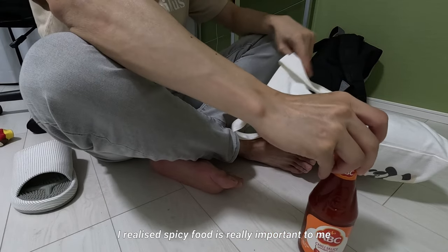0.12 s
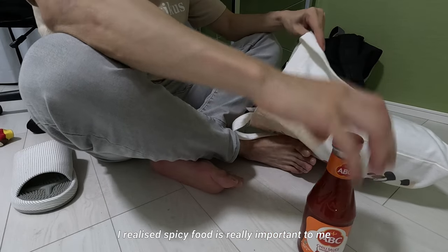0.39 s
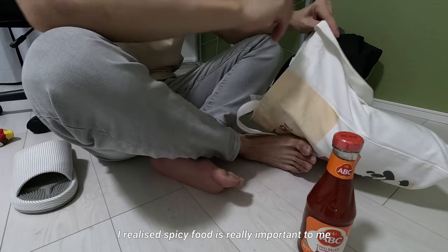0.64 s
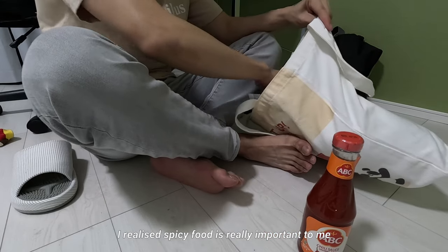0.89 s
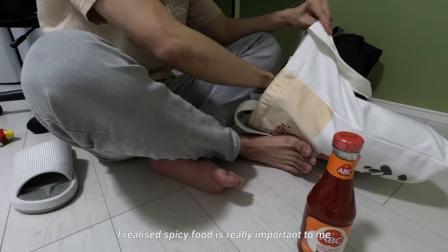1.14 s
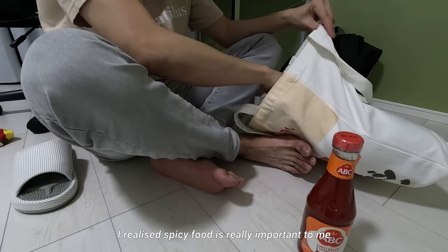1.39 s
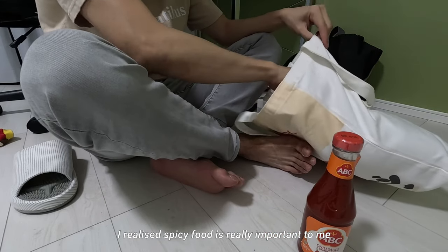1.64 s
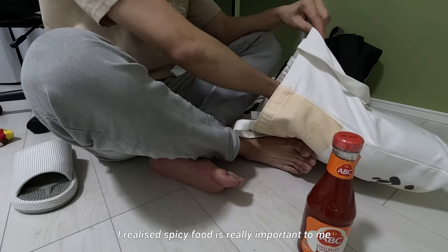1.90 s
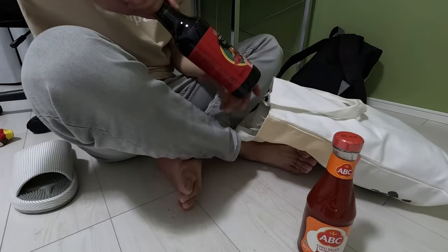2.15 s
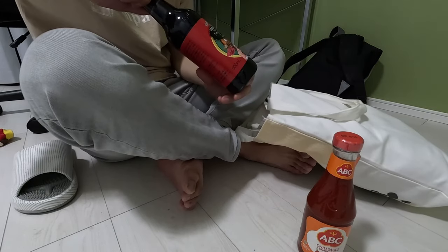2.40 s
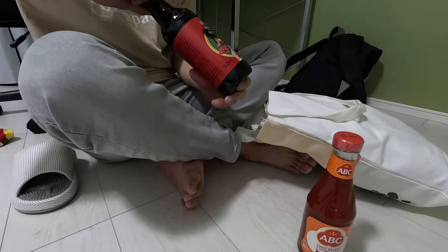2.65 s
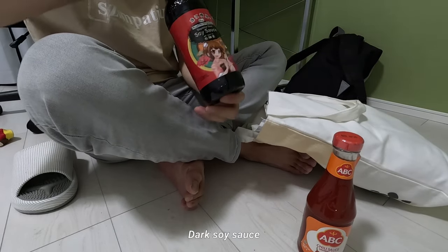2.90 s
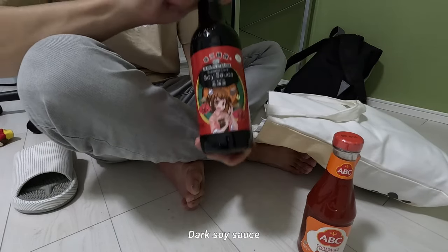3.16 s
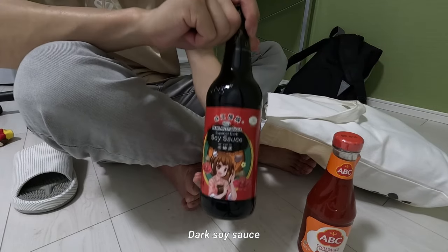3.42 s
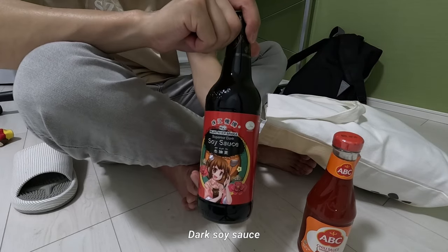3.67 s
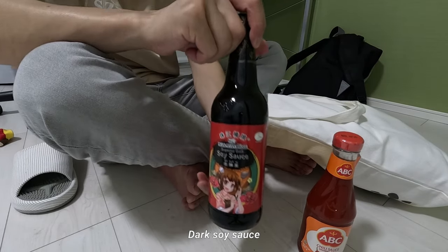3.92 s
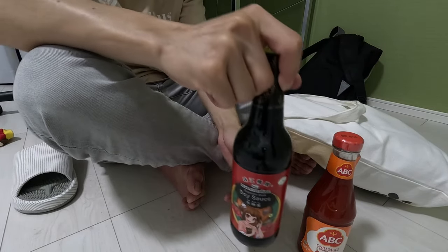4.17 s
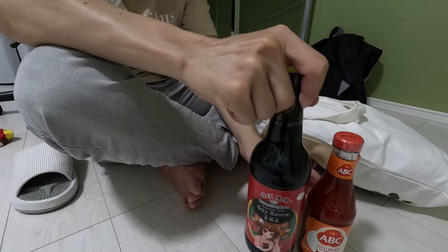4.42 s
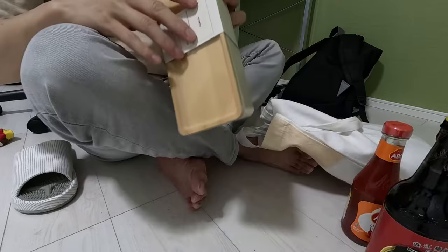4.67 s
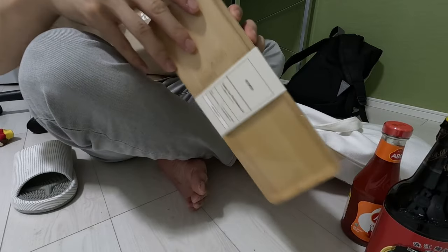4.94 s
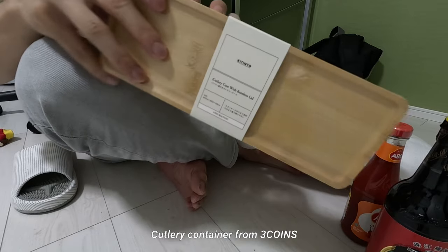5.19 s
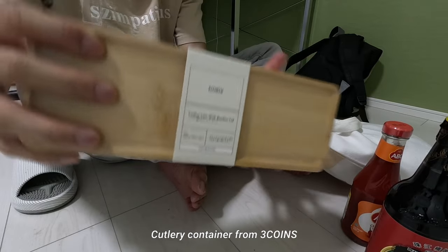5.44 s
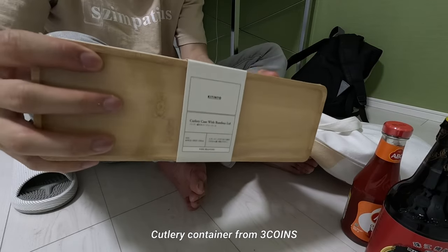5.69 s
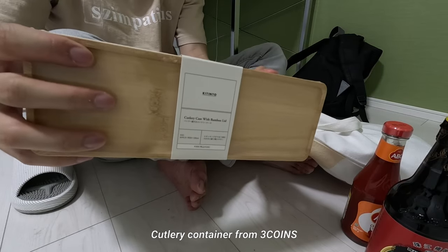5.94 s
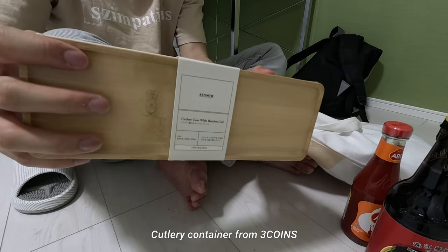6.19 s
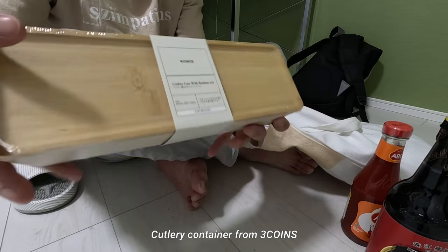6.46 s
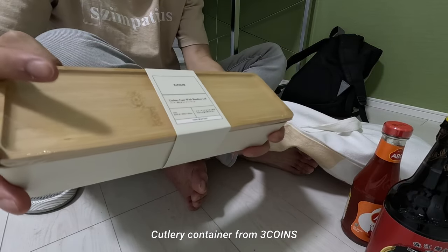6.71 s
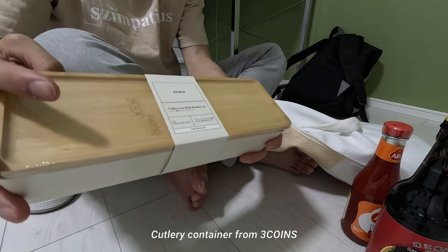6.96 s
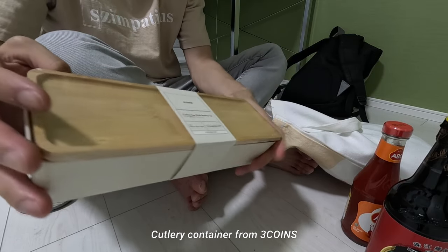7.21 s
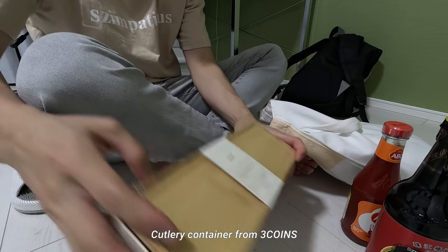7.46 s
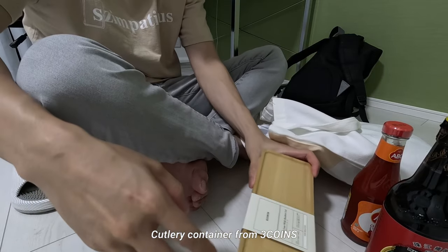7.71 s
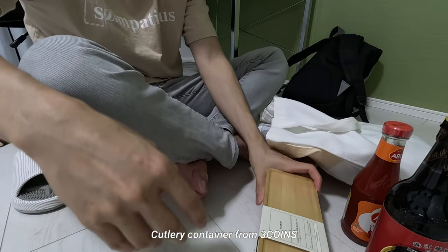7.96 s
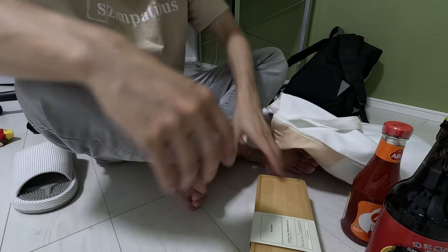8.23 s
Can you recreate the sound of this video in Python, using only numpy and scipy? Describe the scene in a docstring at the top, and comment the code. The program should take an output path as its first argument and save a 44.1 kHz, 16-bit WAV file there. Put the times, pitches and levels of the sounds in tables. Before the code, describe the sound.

Close indoor unpacking: heavy bottle thuds, grainy bag rustling, light hand rubbing and paper rasps, ending with sharp wooden box knocks on tile.

```python
"""Cloth rustles and a full bottle thuds down on a tiled floor as someone unpacks a bag in a small room.
Three stretches join by hard cuts: goods drag and moan in the bag, hands and sleeves rub over glass and a box,
and the wooden box is knocked down and nudged along the tiles. A motor drones faintly outside.
Rubbing is grainy noise in bands, blows set decaying sines ringing, drags are noise in narrow resonances,
and the motor is a stack of wavering sines."""
import sys
import numpy as np
from scipy import signal
from scipy.fft import rfft, irfft, next_fast_len
from scipy.io import wavfile

SR = 44100
rng = np.random.default_rng(int(sys.argv[2]) if len(sys.argv) > 2 else 0)


def gain_from_decibels(decibels):
    """Convert decibel values to linear amplitude factors."""
    exponent = np.asarray(decibels, float) / 20
    return 10 ** exponent


def store_wav(level_fs):
    """Save 16-bit WAV to argv[1]."""
    pcm = np.round(np.clip(np.atleast_2d(level_fs), -1, 1) * 32767)
    wavfile.write(sys.argv[1], SR, pcm.T.astype(np.int16))


N = 368141

# All levels are those of the layers ahead of the microphones; spectra and modes are relative.
# times of the two hard cuts [s]
CUTS_S = [2.14, 4.556]

# fine hiss of fibres: pitch_hz [Hz], density_db [dB per Hz]
HISS_SPECTRUM = [(2500, -3), (3800, -0.5), (4800, 0), (6000, 1), (7600, 0.5), (9000, -5.5), (10200, -6),
                 (11500, -19), (14000, -16.5), (15500, -60)]
# coarse weave, same columns
WEAVE_SPECTRUM = [(1100, -16), (1800, -1), (2200, -3), (3200, -3), (4200, -6), (7000, -18)]
# dull scuff of folds, same columns
SCUFF_SPECTRUM = [(450, -15), (750, 1), (1000, 9.5), (1400, 5), (1900, -1), (3000, -10.5), (5000, -49)]
# left-right likeness of rubbing: pitch_hz [Hz], likeness [0 to 1]
RUB_ALIKE = [(200, 0.62), (1000, 0.78), (3000, 0.65), (7000, 0.94), (15000, 0.85)]
# resonances of the hollow goods: pitch_hz [Hz], width_hz [Hz, sets the decay], level_db [dB]
HOLLOW_MODES = [(191, 22, -31), (276, 71, 8), (369, 94, 4.5), (420, 43, -4.5), (621, 176, 8)]
# cloth and skin never quite still, one row a stretch: hiss_db, weave_db, scuff_db, drag_db [dB]
RESTLESS_DB = [(-72, -62.5, -55, -59), (-81, -87, -70.5, -70.5), (-76, -66.5, -57.5, -59.5)]
# strokes of hands, sleeves and goods: middle_s [s], length_s [s], hiss_db, weave_db, scuff_db [dB]
STROKES = [(-0.01, 0.77, -58.5, -55.5, -57.5), (0.67, 1, -59.5, -59.5, -59), (1.082, 0.23, -58, -54.5, -54),
           (1.21, 0.087, -60.5, -57, -73), (1.273, 0.14, -57.5, -52, -42.5), (1.45, 0.49, -50, -51, -47),
           (1.678, 0.2, -58, -49.5, -44.5), (1.81, 0.44, -60.5, -56, -56),
           (2.041, 0.23, -57.5, -48.5, -45.5), (2.322, 0.48, -65, -65, -81), (2.577, 0.3, -67, -69, -69),
           (2.72, 0.13, -67.5, -70, -68), (2.82, 0.45, -77.5, -88, -87), (3.04, 0.34, -63, -66, -83),
           (3.204, 0.45, -62.5, -54.5, -63), (3.22, 0.29, -74, -56.5, -61), (3.422, 0.36, -57, -53, -63.5),
           (3.555, 0.24, -67, -64, -73), (4.119, 0.29, -57, -65, -70), (4.265, 0.57, -53, -58, -68),
           (4.455, 0.56, -60, -63, -78), (4.578, 0.094, -59, -59, -71), (4.67, 0.14, -56, -69, -75),
           (4.923, 0.14, -49, -61, -63), (5.049, 0.18, -47, -72, -63), (5.184, 0.18, -53, -54, -55.5),
           (5.281, .2, -54.5, -56.5, -50), (5.415, 0.24, -56, -57.5, -58.5), (5.63, 0.14, -58, -56, -65),
           (5.724, 0.34, -64.5, -62.5, -58.5), (5.966, 0.55, -76, -89, -64), (6.157, 0.12, -62, -71, -62),
           (6.33, 0.075, -62, -53, -58), (6.421, 0.056, -49, -53, -66), (6.491, 0.055, -59, -44.5, -47),
           (6.532, 0.47, -62, -59, -55), (6.575, 0.06, -52.5, -46.5, -38.5), (6.693, 0.083, -66, -53, -46),
           (6.75, 0.13, -57, -53, -47), (7.336, 0.17, -60, -61.5, -49), (7.458, 0.29, -64, -63, -57.5),
           (7.554, 0.1, -77, -53.5, -46.5), (7.627, 0.27, -46.5, -56, -51), (7.8, 0.4, -66, -63, -51.5),
           (7.876, 0.13, -68, -52, -33.5), (7.947, 0.23, -61.5, -52.5, -41), (8.078, .2, -64, -58, -51.5),
           (8.198, .15, -55, -61, -36.5), (8.301, .2, -57.5, -43, -38.5)]
STROKE_ROUND = 1.46   # power of the cosine arch
# drag above the scuff of a stroke, one value a stretch [dB]
DRAG_OVER_SCUFF_DB = [5, -7, 0]
# goods shifting with a dull drag alone: middle_s [s], length_s [s], level_db [dB]
SHIFTS = [(0.127, 0.14, -37), (0.5, 0.21, -52.5), (1.424, 0.66, -43.5), (3.12, 0.22, -62),
          (5.651, 0.15, -48.5), (5.935, 0.33, -54.5), (6.226, 0.23, -64)]
# unevenness of all rubbing, one value a stretch [dB]
FLUTTER_DB = [1.5, 0.44, 2]
FLUTTER_HZ = 20.6
# cloth jolted by a tap, hiss and weave against its crack, scuff and drag against its ring [dB]
PUFF_DB = [-22.5, -25.5, -15.5, -21]
PUFF_T60_S = 0.12
# creases snapping in bag and paper band: time_s [s], rate [snaps per s]
CRACKLE_RATE = [(0, 5.8), (.4, 65), (2.1, 69), (2.8, 3.5), (4.5, 2), (4.9, 29), (5.7, 50), (5.8, 10),
                (6.25, 10), (6.3, 50), (6.8, 33), (6.9, 3), (8.35, 6)]

# room air: pitch_hz [Hz], density_db [dB per Hz]
AIR_SPECTRUM = [(25, 8), (50, 2), (100, 0), (200, -4), (300, -9.5), (500, -16.5), (800, -36), (1000, -18.5),
                (1400, -15.5), (2000, -25), (3000, -46), (6000, -57), (10000, -51), (15000, -63)]
# loudness of the air: time_s [s], level_db [dB]
AIR_LEVEL = [(0, -57), (2.139, -60.5), (2.141, -58.5), (4.555, -58.5), (4.557, -64), (8.35, -41)]
# left-right likeness of air and rumble: pitch_hz [Hz], likeness [0 to 1]
AIR_ALIKE = [(60, 1), (290, 0.94), (640, 0.18), (3000, .2), (15000, .1)]
# deep rumble and the floor's drumming: time_s [s], deep_db [dB], drum_db [dB]
RUMBLE_LEVEL = [(0.0, -69, -69), (0.24, -31.5, -47), (0.47, -38.5, -41.5), (0.73, -44.5, -85),
                (0.9, -50.5, -73), (1.11, -57, -59.5), (1.3, -50.5, -56), (1.68, -49.5, -48),
                (1.9, -58, -58), (2.05, -52, -72), (2.135, -43, -59), (2.145, -73, -62), (2.5, -72, -75),
                (2.8, -62, -89), (3.03, -60, -63.5), (3.13, -58, -46.5), (3.24, -57, -62), (3.45, -58, -64),
                (3.75, -52, -63.5), (4.5, -78, -59), (4.75, -46, -68), (5.0, -57, -62), (5.24, -55, -54),
                (5.6, -52, -59), (6.15, -51, -62), (6.6, -64, -59), (7.0, -54, -67), (7.65, -78, -60),
                (7.88, -24.5, -52), (8.06, -44, -56), (8.35, -33, -44)]
RUMBLE_LUMPS_DB, RUMBLE_LUMPS_HZ = 2, 5.7

# taps of fingers, rings and goods: start_s [s], ring_db [dB], ring_hz [Hz], crack_db [dB], crack_hz [Hz]
TAPS = [(0.075, -20.5, 606, -30, 2600), (0.307, -35, 594, -65, 2790), (0.42, -39, 953, -41, 3080),
        (0.461, -56, 980, -39.5, 2940), (0.698, -43, 1010, -36.5, 4230), (0.751, -44, 1030, -36, 3180),
        (0.842, -38.5, 1670, -34.5, 2510), (0.887, -43, 1180, -36, 3700), (1.229, -34.5, 660, -39, 2600),
        (1.447, -17.5, 757, -25.5, 4030), (1.517, -32, 1880, -28.5, 4080), (1.531, -26, 770, -31, 3030),
        (2.047, -26.5, 880, -36, 2600), (2.367, -45, 1620, -40, 6200), (2.434, -45, 1410, -58, 2560),
        (2.472, -32, 1060, -34, 2150), (2.483, -36, 1310, -40, 2750), (4.562, -46.5, 570, -32, 2770),
        (4.638, -43, 1510, -31.5, 3480), (4.951, -57, 980, -32.5, 7060), (5.264, -45, 1020, -46, 3080),
        (5.327, -39, 690, -37, 3750), (5.369, -60, 1220, -36, 3980), (5.474, -43, 1360, -39, 3570),
        (5.524, -54, 1330, -48, 6000), (5.618, -35, 1310, -32.5, 3950), (5.634, -35, 1280, -33, 4070),
        (5.69, -36, 1240, -36, 4480), (5.7, -24.5, 1180, -28, 4330), (6.327, -41, 1020, -24.5, 3500),
        (6.376, -35, 1020, -38, 3240), (6.429, -46, 1070, -27.5, 5440), (6.485, -39, 940, -24, 3800),
        (6.523, -29.5, 1000, -54, 4130), (6.685, -37, 610, -35, 3144), (8.178, -22, 880, -31, 3270)]
TAP_CYCLES = 20   # cycles to die by 60 dB
ROOM_T60_S, WALL_HZ, ROOM_DB = 0.24, 3500, -11   # the decay time is that of the low tones

# bottle rocking to rest: start_s [s], level_db [dB], contact_ms [ms at half height], slab_db [dB over level]
THUDS = [(0.077, -6.5, 0.84, -2.5), (0.161, -18, 2.1, -8), (0.189, -14, 1.96, -11), (0.3097, -9, 1.84, -26),
         (0.426, -22, 1.56, -12), (0.499, -27.5, 1.4, -2)]
# ringing of the tiles: pitch_hz [Hz], level_db [dB], t60_s [s]
FLOOR_MODES = [(165.6, 1.5, 0.17), (102, -16.5, 1), (218.6, -4, 0.097), (327, -3.5, 0.14),
               (413, 6.5, 0.055), (594, -13.5, 0.23)]
# deep note of the slab, same columns
SLAB_MODES = [(85, 0.0072, 0.15)]
SLAB_LATE_S = 0.0145   # the slab answers a little late

# full bottle moaning in tugs along the bag: middle_s [s], length_s [s], pitch_hz [Hz], level_db [dB]
MOAN_TUGS = [(1.083, .12, 400, -47), (1.275, 0.169, 370, -34), (1.498, .2, 315, -43.5),
             (1.641, .1, 370, -29.5), (1.711, .14, 298, -28.5), (1.914, 0.074, 374, -52),
             (2.003, 0.1, 380, -38.5), (2.078, 0.08, 376, -47)]

# swell of the motor's lowest tone: time_s [s], level_db [dB]
DRONE_LEVEL = [(4.56, -62), (4.7, -57), (5.7, -60), (6.27, -58), (6.4, -55), (6.85, -48.5), (7.1, -42),
               (7.78, -46)]
# overtones of the motor: multiple [times the lowest tone], level_db [dB]
OVERTONES = [(2, -55), (3, -62.5), (4, -63.5), (5, -65.5), (6, -71), (7, -69.5)]
MOTOR_HZ, MOTOR_WAVER = 51.14, 0.0079   # lowest tone, spread of its speed as a share
# a second low tone that comes and goes: time_s [s], pitch_hz [Hz], level_db [dB]
GROAN = [(4.6, 70.6, -53), (4.934, 71, -42), (5.062, 71.9, -50), (5.304, 69.7, -45), (5.454, 60.8, -67),
         (5.486, 63, -50), (5.788, 70.2, -54), (6.044, 69, -46), (6.2, 72.1, -77)]

# rasps of the paper band: middle_s [s], level_db [dB], length_s [s, spread of the bell], dull_db [dB over level]
RASPS = [(5.113, -49.5, 0.011, -16), (5.18, -55, 0.012, -8), (5.377, -52, 0.011, -16),
         (5.601, -47.5, 0.0066, -20), (6.297, -53, 0.0095, -2), (6.327, -41, 0.0069, -18),
         (6.4916, -45, 0.0078, -16), (6.582, -64, 0.0088, 4), (6.689, -53, 0.009, 1)]
# fingertip creeping over the lid: middle_s [s], length_s [s], level_db [dB]
CREEPS = [(5.44, 0.13, -44), (5.81, 0.093, -45.5), (5.954, 0.19, -45), (6.085, 0.072, -54),
          (6.157, 0.17, -43), (6.24, 0.09, -57)]
TICKS_PER_S, TICK_UNEVEN, TICK_SPREAD_DB = 45, .35, 3.0
TICK_LOW_HZ, TICK_HIGH_HZ, TICK_T60_S = 4100, 10000, 0.01

# box on the tiles: start_s [s], level_db [dB], then floor_db, body_db, rattle_db [dB over level]
KNOCKS = [(7.838, -1, -8, -8.5, -17.5), (8.1555, -5, -18, -2.5, -9.5), (8.2324, 0, -13.5, -6, -7.5),
          (8.238, -19, -34, 10.5, 18.5)]
# hollow body of the box: pitch_hz [Hz], level_db [dB], t60_s [s]
BODY_MODES = [(320, -3.5, 0.049), (424, -2, 0.053), (620, -10, 0.02)]
# its panels, same columns
PANEL_MODES = [(880, -6, 0.016), (1020, -2.5, 0.016), (1255, 7, 0.007), (1486, -7, 0.037),
               (1610, -5.5, 0.025), (2140, -6, 0.016), (2490, -8, 0.0077)]
# its loose lid, same columns
LID_MODES = [(3150, 4, 0.015), (3780, -4.5, 0.021), (4170, -11.5, 0.04), (4700, -7, 0.02),
             (5500, -2, 0.006), (6330, -10.5, 0.026), (7130, -1, 0.0054)]
# shudder after a knock: pitch_hz [Hz], density_db [dB per Hz]
SHUDDER_SPECTRUM = [(150, -7), (300, 8), (1000, -0.5), (1800, -6), (3000, -17.5), (6000, -33)]
# box sliding on the tiles: time_s [s], level_db [dB]
SLIDE_LEVEL = [(7.88, -47), (7.915, -36), (7.96, -27.5), (8.0, -33), (8.012, -53), (8.04, -34)]

# lean of the near sounds: time_s [s], left_minus_right_db [dB]
LEAN = [(0.0, 1.5), (1.37, -0.5), (2.46, -0.5), (2.83, 2), (3.16, 0), (4.04, 2.5), (4.6, 1.5), (6.0, 3),
        (6.6, 1.5), (7.02, 3.5), (8.35, 0.5)]
# tilt of the microphone pair: pitch_hz [Hz], left_minus_right_db [dB]
MIC_TILT = [(60, 0.0), (180, -0.5), (550, -1), (1650, -0.5), (4970, -1.5), (15000, 2)]


def rms_one(x):
    """Scale to rms 1."""
    return x / np.sqrt(np.mean(x ** 2) + 1e-20)


def in_time(rows):
    """Columns of a curve, one value a sample."""
    s, *columns = np.transpose(rows)
    return [np.interp(np.arange(N) / SR, s, c) for c in columns]


def while_on(rows):
    """1 inside a curve's span, with 10 ms edges."""
    t = np.arange(N) / SR
    return np.clip(np.minimum(t - rows[0][0], rows[-1][0] - t) * 100, 0, 1)


def at_hz(points, hz):
    """Read a spectrum on a log frequency axis."""
    return np.interp(np.log(hz), np.log(np.array(points)[:, 0]), np.array(points)[:, 1])


def drift(rate):
    """Slow random wander of spread 1: noise through two equal poles at rate Hz, made at every 40th sample."""
    r = np.exp(-80 * np.pi * rate / SR)
    noise = rng.standard_normal(N // 40 + 2002)
    slow = signal.lfilter([1], [1, -2 * r, r * r], noise)[2000:]   # drop the run-in
    return np.interp(np.arange(N) / 40, np.arange(len(slow)), rms_one(slow - slow.mean()))


def ring(clicks, hz, t60):
    """A unit click sets a sine of height 1 ringing."""
    r, w = gain_from_decibels(-60 / (t60 * SR)), 2 * np.pi * hz / SR
    return signal.lfilter([0, np.sin(w)], [1, -2 * r * np.cos(w), r * r], clicks + 1e-18)


def dying(clicks, t60):
    """Every click starts an envelope that falls by 60 dB in t60 seconds."""
    return signal.lfilter([1], [1, -gain_from_decibels(-60 / (t60 * SR))], clicks)


def grains(per_s, spread_db):
    """Random slips of uneven size over a smooth bed of noise."""
    sizes = gain_from_decibels(spread_db * np.minimum(rng.exponential(1, N), 5))
    return rng.standard_normal(N) * (1 + sizes * (rng.random(N) < per_s / SR))


def banded(source, spectrum, alike, patchy_db):
    """Coloured noise in overlapping octave bands that flicker; left and right partly alike; rms 1."""
    size = next_fast_len(N)
    hz = np.maximum(np.arange(size // 2 + 1) * SR / size, 1)
    likeness = np.clip(at_hz(alike, hz), 0, 1)
    mid, side = rfft([source, rng.standard_normal(N) * np.std(source)], size)
    inside = (hz > spectrum[0][0]) & (hz < spectrum[-1][0])
    pair = np.sqrt(1 + likeness) * mid + np.sqrt(1 - likeness) * side * np.array([[1], [-1]])
    pair = inside * gain_from_decibels(at_hz(spectrum, hz)) * pair
    together = drift(14.0)   # flicker shared by all bands
    octave = np.log2(hz / spectrum[0][0])
    out = 0
    for k in range(int(np.log2(spectrum[-1][0] / spectrum[0][0])) + 2):
        share = np.clip(1 - np.abs(octave - k), 0, 1)
        flicker = gain_from_decibels(patchy_db * (together + .5 * drift(9.0)))
        out = out + flicker * irfft(share * pair, size)[:, :N]
    return rms_one(out)


def narrow(hz, width):
    """Stick-slip noise in a narrow resonance: slow complex noise riding on a moving pitch."""
    turn = 2 * np.pi * np.cumsum(hz) / SR
    return rms_one(drift(width) * np.cos(turn) + drift(width) * np.sin(turn))


def strike(times, dbs, modes, scatter_db, flip=-1):
    """Every blow excites every mode, with a little scatter; at flip -1 neighbouring modes swing opposed."""
    at, out = np.round(np.array(times) * SR).astype(int), np.zeros(N)
    scatter = scatter_db * rng.standard_normal((len(at), len(modes)))
    for k, (hz, db, t60) in enumerate(modes):
        clicks = np.zeros(N)
        clicks[at] = gain_from_decibels(np.array(dbs) + db + scatter[:, k]) * flip ** k
        out += ring(clicks, hz, t60)
    return out


def soft(x, ms):
    """A blunt contact: the push is a bell about ms milliseconds wide at half height."""
    push = np.hanning(int(ms * SR / 500) + 3)
    return signal.fftconvolve(x, push / push.sum())[:N]


def stretch(s):
    """Which of the three stretches a time falls in."""
    return np.searchsorted(CUTS_S, s)


def arch(middle, length):
    """A cosine arch that a cut breaks off."""
    t = np.arange(N) / SR
    swell = np.cos(np.pi * np.clip((t - middle) / length, -.5, .5)) ** STROKE_ROUND
    return swell * (stretch(t) == stretch(middle))


def rub_levels():
    """Gains of hiss, weave, scuff and drag: restless bed, strokes, shifts and puffs after taps add in power."""
    now = stretch(np.arange(N) / SR)
    power = gain_from_decibels(np.transpose(RESTLESS_DB))[:, now] ** 2
    for s, length, hiss_db, weave_db, scuff_db in STROKES:
        dbs = [hiss_db, weave_db, scuff_db, scuff_db + DRAG_OVER_SCUFF_DB[stretch(s)]]
        i, j = max(int((s - length / 2) * SR), 0), int((s + length / 2) * SR)
        power[:, i:j] += (gain_from_decibels(np.array(dbs))[:, None] * arch(s, length)[i:j]) ** 2
    power[3] += sum((gain_from_decibels(db) * arch(s, length)) ** 2 for s, length, db in SHIFTS)
    jolts = np.zeros((4, N))
    for s, ring_db, ring_hz, crack_db, crack_hz in TAPS:
        jolts[:, round(s * SR)] = gain_from_decibels(np.array([crack_db, crack_db, ring_db, ring_db]) + PUFF_DB)
    puffs = dying(jolts + 1e-18, PUFF_T60_S)
    flutter = gain_from_decibels(np.array(FLUTTER_DB)[now] * drift(FLUTTER_HZ))
    return np.sqrt(power + puffs ** 2) * flutter


def crackle():
    """Creases snap at random, each a very short ring at one of eight pitches."""
    sizes = gain_from_decibels(6.54 * np.minimum(rng.exponential(1, N), 3))
    snaps = (rng.random(N) < in_time(CRACKLE_RATE)[0] / SR) * sizes
    pitches, dealt = np.geomspace(2500, 9000, 8), rng.integers(0, 8, N)
    out = sum(ring(snaps * (dealt == k), hz, 11.3 / hz) for k, hz in enumerate(pitches))
    return signal.sosfilt(signal.butter(2, 9500, fs=SR, output="sos"), out)


def hollow_drag():
    """Slips of cloth ring the hollow goods; each resonance flickers by itself."""
    slips, out = grains(200.0, 3.5), 0
    for hz, width, db in HOLLOW_MODES:
        out = out + gain_from_decibels(db + 5.54 * drift(22.6)) * rms_one(ring(slips, hz, 1.7 / width))
    return rms_one(signal.sosfilt(signal.butter(2, [150, 800], "band", fs=SR, output="sos"), out))


def rubbing():
    """Fibres hiss, folds scuff and creases snap; the drag through hollow goods is returned apart."""
    fine, coarse, dull, pull = rub_levels()
    hiss = fine * banded(grains(200.0, 3.5), HISS_SPECTRUM, RUB_ALIKE, patchy_db=.7)
    weave = coarse * banded(grains(200.0, 3.5), WEAVE_SPECTRUM, RUB_ALIKE, patchy_db=.8)
    scuff = dull * banded(grains(150.0, 3.5), SCUFF_SPECTRUM, RUB_ALIKE, patchy_db=.8)
    snaps = gain_from_decibels(2) * np.sqrt(fine * coarse) * crackle()
    return hiss + weave + scuff + snaps, pull * hollow_drag()


def air():
    """Room air: a bed of coloured noise, wide in the treble, whose bands flicker."""
    noise = rng.standard_normal(N)
    return gain_from_decibels(in_time(AIR_LEVEL)[0]) * banded(noise, AIR_SPECTRUM, AIR_ALIKE, patchy_db=-1.0)


def rumble():
    """Deep rumble and the floor's drumming: two low noise bands with lumpy levels."""
    deep_db, drum_db = in_time(RUMBLE_LEVEL)
    deep_spectrum = [(18, -16), (32, 0.5), (60, 4.5), (90, -5.0), (120, 0.0)]   # Hz, dB per Hz
    drum_spectrum = [(85, -21), (110, -1), (170, -5), (210, -2.0), (280, -27.0)]
    deep = banded(rng.standard_normal(N), deep_spectrum, AIR_ALIKE, patchy_db=0.0)
    drum = banded(rng.standard_normal(N), drum_spectrum, AIR_ALIKE, patchy_db=0.5)
    deep = gain_from_decibels(deep_db + RUMBLE_LUMPS_DB * drift(RUMBLE_LUMPS_HZ)) * deep
    return deep + gain_from_decibels(drum_db + RUMBLE_LUMPS_DB * drift(RUMBLE_LUMPS_HZ)) * drum


def taps():
    """A short ring at the struck spot's pitch, an overtone, and a crack of a few milliseconds."""
    out, t = np.zeros(N + 4000), np.arange(4000) / SR
    for s, ring_db, ring_hz, crack_db, crack_hz in TAPS:
        tone = np.sin(2 * np.pi * ring_hz * t) + 0.19 * np.sin(2 * np.pi * 1.8 * ring_hz * t)
        fade = gain_from_decibels(ring_db - 60 * t * ring_hz / TAP_CYCLES) * (1 - np.exp(-t / 0.00015))
        band = signal.butter(2, [crack_hz / 1.25, min(crack_hz * 1.39, 9500)], "band", fs=SR)
        crack = signal.lfilter(*band, np.sign(rng.standard_normal(4000)) * gain_from_decibels(-60 * t / 0.026))
        i = round(s * SR)
        out[i:i + 4000] += fade * tone + gain_from_decibels(crack_db) * crack
    return signal.sosfilt(signal.butter(3, 9000, fs=SR, output="sos"), out[:N])


def room(x):
    """Small-room echo: eight feedback delays a side, duller on every round."""
    size = next_fast_len(N + SR)
    spectrum, hz = rfft(x, size), np.arange(size // 2 + 1) * SR / size
    out = np.zeros((2, len(hz)), complex)
    for k, lag in enumerate(rng.uniform(0.0055, .03, 16)):
        loop = gain_from_decibels(-60 * lag / ROOM_T60_S) / (1 + 1j * hz / WALL_HZ) * np.exp(-2j * np.pi * hz * lag)
        out[k % 2] += loop / (1 - loop) * (-1) ** (k // 2)
    thin = (hz / (hz + 500)) ** 2   # deep bass goes out through the walls
    return irfft(out * spectrum * thin, size)[:, :N]


def slab(times, dbs):
    """The floor slab's deep note, a little after the blow."""
    return -soft(strike(np.array(times) + SLAB_LATE_S, dbs, SLAB_MODES, 0.65), ms=0.34)


def bottle():
    """A heavy glass base: a blunt push into tiles and slab."""
    tiles = 0
    for s, db, contact_ms, slab_db in THUDS:
        tiles = tiles + soft(strike([s], [db - 8.5], FLOOR_MODES, 0.75, flip=0.97), contact_ms)
    s, db, contact_ms, slab_db = np.transpose(THUDS)
    return slab(s, db + slab_db) - tiles


def moan():
    """The dragged bottle, with rougher overtones from uneven slips; the strongest tug sets the pitch."""
    tugs = np.array([(gain_from_decibels(db) * arch(s, length)) ** 2 + 1e-12 for s, length, hz, db in MOAN_TUGS])
    power = tugs.sum(axis=0)
    hz = np.array(MOAN_TUGS)[:, 2] @ tugs / power
    voice = narrow(hz, width=49.0) + 0.23 * narrow(1.4 * hz, width=60.0) + 0.039 * narrow(1.1 * hz, width=99.0)
    return np.sqrt(power) * voice


def motor():
    """Motor outside: wavering low tones from the second cut on, and a groan that comes and goes."""
    turn = 2 * np.pi * np.cumsum(MOTOR_HZ * (1 + MOTOR_WAVER * drift(3.1))) / SR
    drone = gain_from_decibels(in_time(DRONE_LEVEL)[0]) * np.sin(turn)
    for multiple, db in OVERTONES:
        drone = drone + gain_from_decibels(db + 4.0 * drift(4.0)) * np.sin(multiple * turn + multiple)
    low_hz, low_db = in_time(GROAN)
    groan = gain_from_decibels(low_db) * while_on(GROAN) * np.sin(2 * np.pi * np.cumsum(low_hz) / SR)
    return np.sqrt(2) * ((np.arange(N) > CUTS_S[1] * SR) * drone + groan)   # table levels are rms


def rasps():
    """Paper band under the fingers: bell-shaped bursts of coarse grains, bright with a dull part."""
    t, bright, dull = np.arange(N) / SR, 0, 0
    for s, db, length, dull_db in RASPS:
        bell = gain_from_decibels(db) * np.exp(-.5 * ((t - s) / length) ** 2)
        bright = bright + bell
        dull = dull + gain_from_decibels(dull_db) * bell
    bright_noise = banded(grains(600.0, 3.0), WEAVE_SPECTRUM[:4] + HISS_SPECTRUM[2:], RUB_ALIKE, 0)
    dull_noise = banded(grains(400.0, 3.0), SCUFF_SPECTRUM, RUB_ALIKE, 0)
    return bright * bright_noise + dull * dull_noise


def ticks():
    """Skin sticks and lets go at a loosely even pace; each slip is a bright burst of a few milliseconds."""
    count = np.floor(np.cumsum(TICKS_PER_S * np.exp(TICK_UNEVEN * drift(30.0))) / SR)
    slips = np.diff(count, prepend=0) * gain_from_decibels(TICK_SPREAD_DB * rng.standard_normal(N))
    slips = slips * sum(gain_from_decibels(db) * arch(s, length) for s, length, db in CREEPS)
    bursts = dying(slips + 1e-18, TICK_T60_S) * rng.standard_normal(N)
    return signal.sosfilt(signal.butter(2, [TICK_LOW_HZ, TICK_HIGH_HZ], "band", fs=SR, output="sos"), bursts)


def box_slide():
    """The box scrapes over the tiles: three narrow bands of stick-slip noise that sink in pitch."""
    hz = in_time([(7.9, 808), (8.0, 661)])[0]
    scrape = narrow(hz, width=94.0) + 0.74 * narrow(.76 * hz, width=140.0) + 0.2 * narrow(0.4 * hz, width=43.0)
    return gain_from_decibels(in_time(SLIDE_LEVEL)[0]) * while_on(SLIDE_LEVEL) * rms_one(scrape)


def box():
    """Each knock rings panels, hollow body, loose lid, tiles and slab, then shudders out; the slide joins in."""
    s, db, floor_db, body_db, lid_db = np.transpose(KNOCKS)
    scatter_db = 1.5
    wood = strike(s, db - 5.5, PANEL_MODES, scatter_db) + strike(s, db + body_db, BODY_MODES, scatter_db)
    wood = wood + strike(s, db + lid_db - 14.5, LID_MODES, scatter_db)
    wood = signal.sosfilt(signal.butter(3, 8000, fs=SR, output="sos"), wood)
    blows = np.zeros(N)
    blows[np.round(s * SR).astype(int)] = gain_from_decibels(db - 21.5)
    shudder = dying(blows, .22) * banded(grains(240.0, 1.1), SHUDDER_SPECTRUM, RUB_ALIKE, 0)
    tiles = soft(strike(s, db + floor_db - 10.5, FLOOR_MODES, scatter_db, flip=1), ms=0.76)
    return wood + shudder - tiles + slab(s, db + floor_db) + box_slide()


def scene():
    """Near sounds lean with the hands; air, rumble and motor fill the room."""
    cloth, drag = rubbing()
    hits = bottle() + box() + taps() + drag + moan()
    lean = gain_from_decibels(in_time(LEAN)[0] * np.array([[.5], [-.5]]))
    near = lean * (hits + cloth + rasps() + ticks())
    far = air() + rumble() + motor()
    return near + gain_from_decibels(ROOM_DB) * room(np.mean(hits, axis=0)) + far


def band_limit(x):
    """A steep low-pass at the top of the band."""
    return signal.sosfilt(signal.butter(12, 15590, fs=SR, output="sos"), x)


def record(dry):
    """The left port hears the lower tones a little late; the top is dull; loud peaks are rounded."""
    hz = np.arange(N // 2 + 1) * SR / N + 1
    late_s = 2.2e-5 / (1 + (hz / 6000) ** 2)
    tilt = gain_from_decibels(at_hz(MIC_TILT, hz) * np.array([[.5], [-.5]]))
    ports = tilt * np.exp(-2j * np.pi * hz * late_s * np.array([[1], [0]]))
    heard = irfft(rfft(dry) * ports, N)
    dull = signal.sosfilt(signal.butter(2, 13000, fs=SR, output="sos"), heard)
    mix = 1.143 * np.tanh(dull / 1.424)
    return band_limit(mix)


dry = scene()
out = record(dry)
store_wav(out)
```